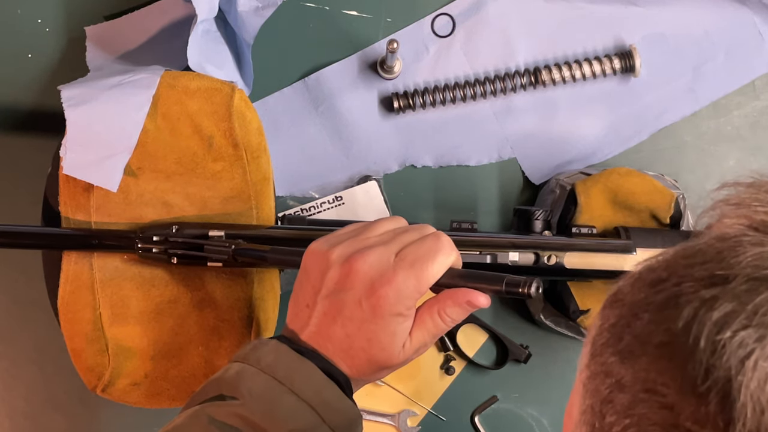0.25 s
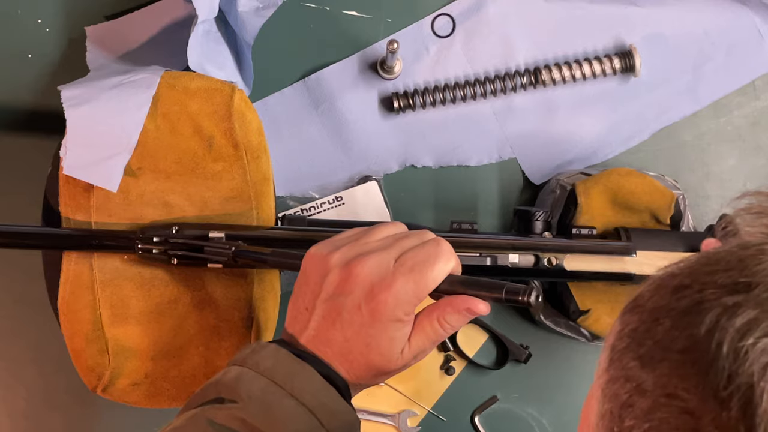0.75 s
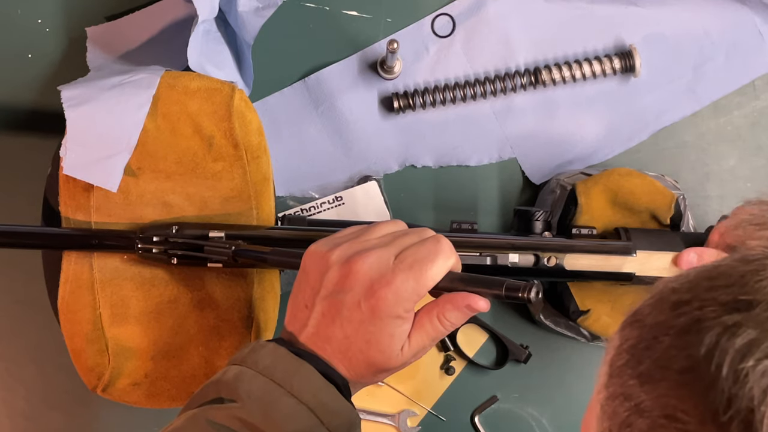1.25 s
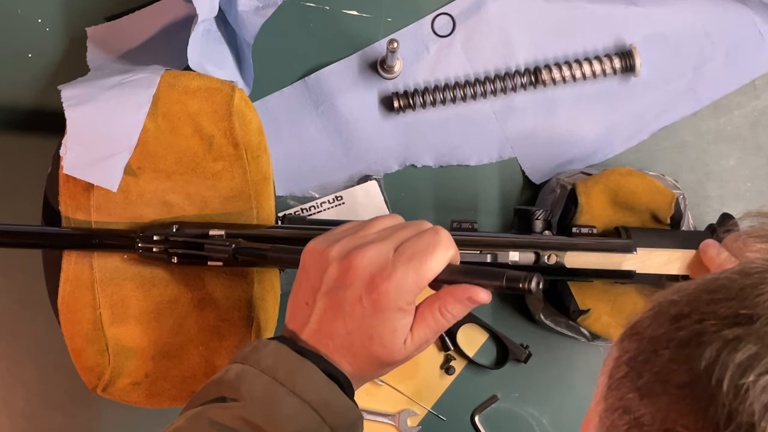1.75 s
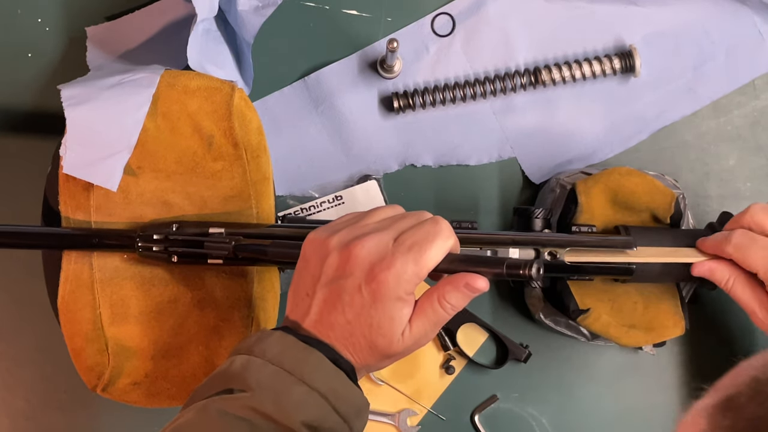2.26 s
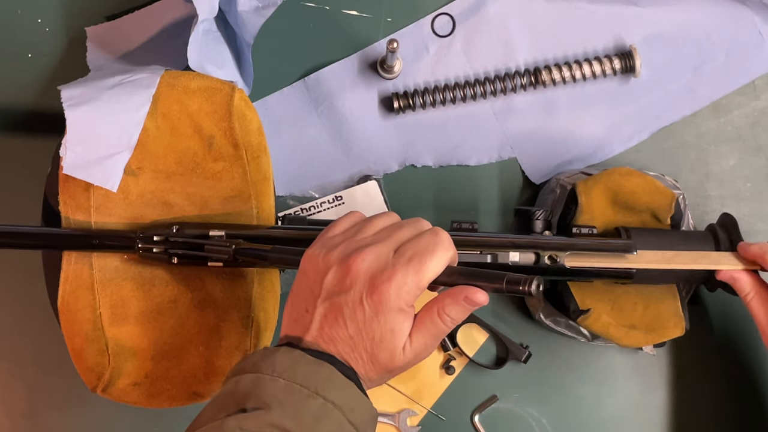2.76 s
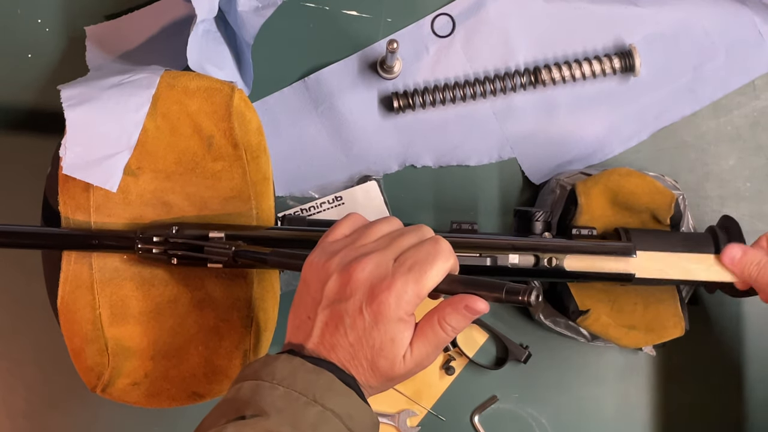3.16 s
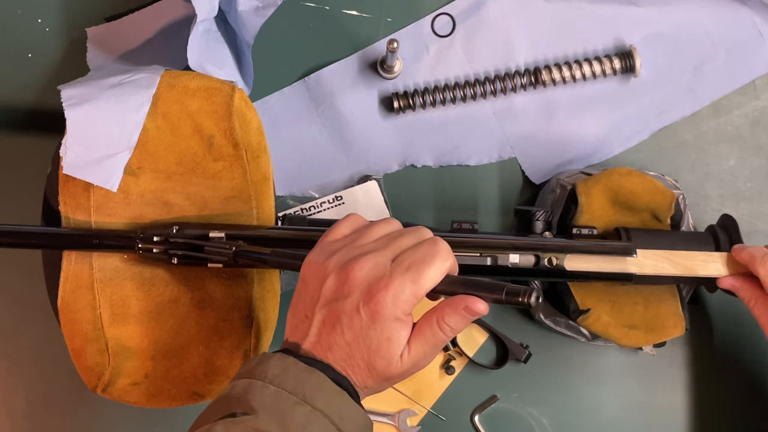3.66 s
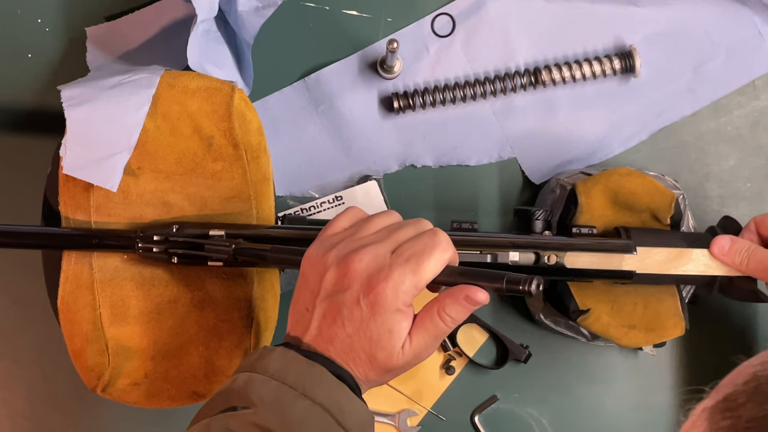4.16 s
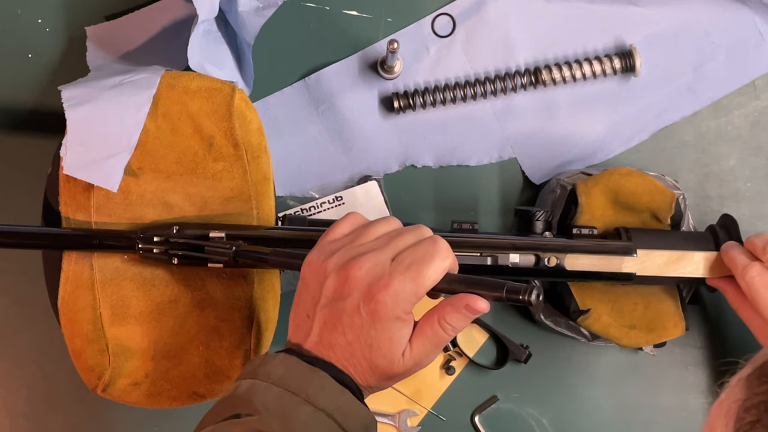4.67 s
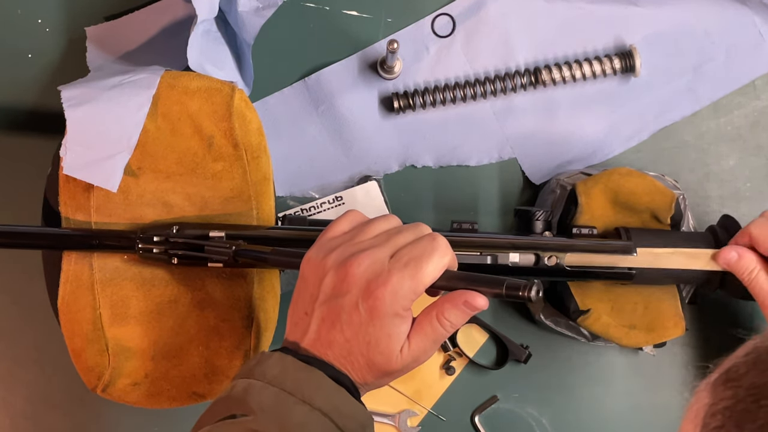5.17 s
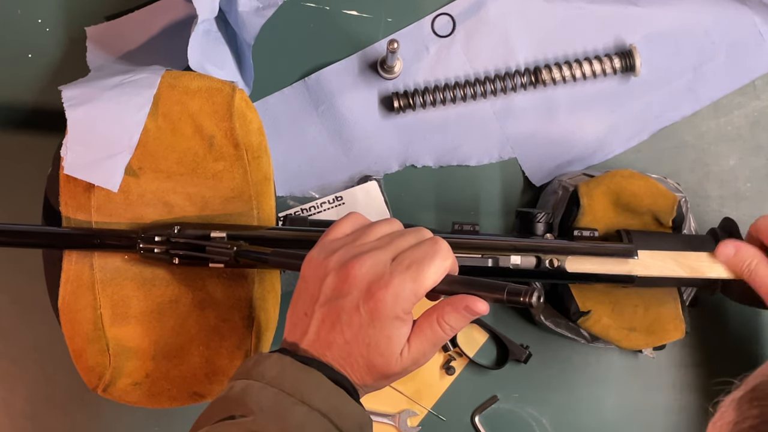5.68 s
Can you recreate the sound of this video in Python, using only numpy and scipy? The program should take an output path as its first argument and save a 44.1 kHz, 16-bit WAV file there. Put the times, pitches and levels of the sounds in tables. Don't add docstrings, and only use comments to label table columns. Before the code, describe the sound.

Close stereo pickup of a hand pushing and twisting a padded stick in a hollow steel cylinder. Bright, gritty clacks tumble in irregular clusters with short squeaky metallic tones, low bench thumps and a quick room tail. Quiet pauses hold soft touches, sleeve rustle and a faint loose-metal rattle; the later strokes hit loudest, then it calms.

```python
import sys
import numpy as np
from scipy import signal
from scipy.fft import rfft, irfft, next_fast_len
from scipy.io import wavfile
from scipy.ndimage import uniform_filter1d, map_coordinates

SR = 44100
rng = np.random.default_rng(int(sys.argv[2]) if len(sys.argv) > 2 else 0)


def digitize_waveform(pressure):
    field = np.atleast_2d(pressure).T
    bounded = np.clip(field, -1, 1)
    quanta = np.round(bounded * 32767).astype(np.int16)
    wavfile.write(sys.argv[1], SR, quanta)


def gain_from_db(level_db):
    decades = np.asarray(level_db, float) / 20
    return 10 ** decades


N = 261072


# start_s, peak_db, air_ring_hz, weight_db
FIRST_PASS = [(0.002, -25, 5240, 3), (0.017, -22.5, 4130, 9.5), (0.023, -28, 4500, -1),
              (0.034, -24, 4110, 5), (0.0532, -27.5, 4600, 4.5), (0.0467, -24.5, 4390, 5.5),
              (0.07, -21, 4390, 0.5), (0.1009, -17.5, 5300, 5), (0.122, -17, 5950, 4.5),
              (0.1397, -21, 4310, 5.5), (0.163, -22.5, 4520, 3), (0.196, -19, 4900, 3.5),
              (0.7497, -14.5, 5530, 5.5), (0.7883, -18.5, 5300, 3.5), (0.8272, -15, 4900, 3.5),
              (0.845, -29.5, 4850, -11), (0.8763, -15.5, 5300, -0.5), (.895, -22.5, 6500, -2),
              (0.9083, -16.5, 6960, 1), (0.9325, -18.5, 6400, 2), (0.9558, -22, 5300, 4.5),
              (0.9849, -18, 5300, 1), (1.0294, -25, 4750, 1.5), (1.106, -13.5, 4630, 0),
              (1.112, -20, 4780, -8.5), (1.1279, -15.5, 4840, 1.5), (1.136, -19, 4900, -5.5),
              (1.14, -24, 4700, 0), (1.146, -28, 4700, 0), (1.1541, -17, 4600, 0), (1.171, -29, 4800, -7.5),
              (1.1978, -17.5, 4400, 0.5), (1.2316, -15, 4470, 2.5)]
SECOND_PASS = [(2.08, -15.5, 6000, 3), (2.1267, -16.5, 5470, 4), (2.1337, -22, 5500, 2),
               (2.16, -16, 5530, 0.5), (2.1728, -28.5, 4860, 5.5), (2.1993, -20, 5760, 1),
               (2.2304, -19, 3000, -0.5), (2.262, -21, 3010, 1.2), (3.0162, -14, 4440, 2),
               (3.0333, -23.5, 4950, -11), (3.047, -21.5, 5260, 1.5), (3.089, -15.5, 4170, -0.8),
               (3.1136, -21, 4220, -7.5), (3.1314, -14, 3750, -3), (3.1481, -15, 5030, 2),
               (3.1621, -13, 3560, -4), (3.176, -13, 3470, -1.5), (3.1884, -13, 3730, 3),
               (3.2, -12.5, 3660, -13.5), (3.2116, -11.5, 3570, 1.5), (3.2177, -14, 5490, 1.5),
               (3.2308, -14.5, 3500, 5), (3.2407, -15, 3470, 2.6), (3.2507, -19, 3570, 5),
               (3.2637, -15.5, 5120, 1), (3.2715, -14, 3750, 4.5), (3.2833, -17, 3750, -4),
               (3.2916, -22, 3650, 9), (3.303, -23.5, 3910, 2)]
THIRD_PASS = [(3.7811, -31, 3600, 0), (3.7995, -17.5, 3600, -2.5), (3.832, -17, 4170, 0),
              (3.86, -19.5, 6420, 2), (3.8839, -22.5, 5810, 6), (3.906, -22.5, 4820, 6),
              (3.937, -16, 4150, 0.5), (3.966, -13, 4200, -1), (3.9887, -13, 5170, 1),
              (4.0057, -12.5, 4690, 0), (4.022, -9.5, 4600, 2.5), (4.036, -11, 4440, -2),
              (4.0553, -10.5, 4400, -0.5), (4.068, -25, 4680, -7), (4.079, -31, 4660, -2.5),
              (4.0904, -31, 4680, -5.5)]
LAST_PASS = [(4.8494, -16.5, 5840, 2.5), (4.9575, -8, 4300, 0), (4.9671, -14, 4500, -1.5),
             (4.9774, -13, 6200, -2), (5.0001, -11, 6400, -2.3), (5.0078, -18.5, 6070, 3.5),
             (5.0571, -14, 4130, 0), (5.08, -19.5, 3010, 4), (5.0963, -20, 3010, 4.5),
             (5.1108, -22, 3920, 3), (5.1353, -22, 4200, -4), (5.1513, -22, 4520, 2.5),
             (5.165, -20.5, 4100, -3.5), (5.1731, -19, 4310, 0.5), (5.1854, -19.5, 4130, 3.5),
             (5.3009, -8.5, 5370, 1.5), (5.3075, -21, 5600, -1), (5.3276, -16.5, 5050, -5.5),
             (5.341, -15.5, 3700, -13), (5.3639, -18.5, 3500, -2.5), (5.5003, -9, 6140, 0.6),
             (5.5173, -18.5, 4740, -3)]
# start_s, peak_db,
# air_ring_hz, weight_db, hardness_db
TOUCHES = [(0.384, -53.5, 3010, 7.5, -7), (0.4878, -46, 3010, 17, -31), (0.6807, -44, 6460, 10.5, -14.5),
           (2.0291, -28, 3060, 8, -19.5), (2.0346, -36.5, 4700, 2.5, -14.5), (2.384, -58.5, 3050, 14, -25),
           (3.4157, -41, 3150, 3.5, -20), (3.5356, -40.5, 2950, 6.5, -25), (3.6864, -45.5, 3010, 4, -26),
           (4.203, -26.5, 3900, 1.5, -16), (4.278, -50, 3600, 7.5, -10.5), (5.7324, -37, 3140, -8.5, -25),
           (5.7485, -39, 6400, 3, -16), (5.767, -43.5, 3060, 9.5, -8.5), (5.82, -44.5, 3010, 17, -19)]


def contacts():
    slid = []
    for slip in FIRST_PASS + SECOND_PASS + THIRD_PASS + LAST_PASS:
        hardness_db = -15.5 + 0.2 * slip[3]
        slid.append((*slip, hardness_db))
    return np.transpose(sorted(slid + TOUCHES))


# time_s, knock_grip_db, depth (-1 shallow to 1 deep), wash_after_slip_db
ROD = [(0.01, -16.5, -0.56, -0.5), (.2, -16, 0.18, -0.5), (.75, -19, 0.085, -1), (1.1, -12.5, 0.76, -3.5),
       (2.031, -16.5, 0.38, 2.5), (2.2, -8, -0.29, 0), (3.02, -9, -0.44, -2), (3.12, -10, -0.6, -4),
       (3.23, -16, 0.81, -1.5), (3.8, -13, -0.28, -2.5), (4.04, -15.5, 0.83, -3.5), (4.2, -6.5, -0.38, -1),
       (4.95, -14, -0.27, -3.5), (5.15, -11.5, -0.1, -1), (5.5, -12.5, -0.32, -2.5)]
DEPTH_LOW_DB, DEPTH_BODY_DB = 5, 3


def rod(s):
    at, *columns = np.transpose(ROD)
    return [np.interp(s, at, column) for column in columns]


PART_HZ = np.array([650, 1030, 1330, 1800, 2500, 3100, 3700, 4400, 5100, 5800, 6500, 7200])


def parts(hz):
    return np.array([np.interp(hz, PART_HZ, one) for one in np.eye(len(PART_HZ))])


# frequency_hz, density_db
TUBE = [(100, -41), (150, -9.5), (454, -15), (727, -10), (1040, -12), (1380, -8.5), (1530, -16.5),
        (1890, -4.5), (2900, -2.5), (4700, 0.5), (6500, -1), (6900, -8), (8800, -13), (12300, -14),
        (13450, -36.5), (16500, -42.5)]
# frequency_hz, width_hz, level_over_broad_colour_db
STEEL = [(730, 5.5, 8.5), (1040, 14, 13.5), (1136, 14, 0), (1236, 11, 2.5), (1338, 5.2, 7.5), (1893, 23, 6),
         (2190, 19, 6), (3650, 54, 3), (4300, 84, 4), (4117, 33, 0.5), (4760, 18, -2), (4985, 20, 5),
         (5840, 23, 6), (4850, 17, 0)]


def tube(hz):
    return along(TUBE, hz) * np.sqrt(1 + peaks(STEEL, hz) ** 2)


def slip_levels(s, db, ring_hz, body_db, edge_db):
    grip_db, depth, wash_db = rod(s)
    knock_db = grip_db + 0.93 * body_db + 15.0
    low, high = DEPTH_LOW_DB * depth, DEPTH_BODY_DB * depth
    near = np.exp(-(np.log(PART_HZ[5:-1, None] / ring_hz) / .15) ** 2)
    lift_db = 9 * near - 4
    lift_db[0] += body_db / 2
    thud_db = knock_db + 0.5 + 0.5 * depth
    colour_db = np.vstack([thud_db, knock_db - low, knock_db + low,
                           body_db + high, body_db - high, lift_db, edge_db + 15.0])
    size = gain_from_db(db + colour_db)
    lasting = size.copy()
    lasting[5:-1] *= gain_from_db(3.0 + wash_db - 5.9 * near)
    return size, lasting


def tiny_jerks(depth):
    t = np.arange(160) / SR
    jerks = rng.standard_normal((len(depth), len(t))) * (t / .00052) * np.exp(-t / 0.0004)
    spread = rfft(jerks)
    round_trip_s = (0.912 + 0.41 * depth[:, None]) / 1000
    column = 1 - 0.11 * np.exp(-2j * np.pi * np.fft.rfftfreq(len(t), 1 / SR) * round_trip_s)
    jerks = irfft(column * spread / np.abs(spread) ** .9)
    return jerks / np.linalg.norm(jerks, axis=1)[:, None]


# delay_s, level_db
ECHOES = [
    (.00108, -10.5),
    (.0042, -36.5),
    (.007, -8.5),
    (0.013, -16),
    (0.017, -15),
]


def walls(hz):
    return 1 + sum(gain_from_db(db) * np.exp(-2j * np.pi * hz * delay) for delay, db in ECHOES)


# tail_under_crack_db, t60_s
ROOM = [
    (-6.5, 0.23),
    (-13.5, 0.26),
    (-8.5, 0.26),
    (-9.5, 0.22),
]


def room_fade(start, lasting):
    energy = np.array([np.bincount(start, g ** 2, N) for g in lasting])
    room = np.repeat(ROOM, [3, 2, 6, 1], axis=0)
    fade = []
    for e, (db, t60) in zip(energy, room):
        fade.append(signal.lfilter([gain_from_db(db) ** 2], [1, -gain_from_db(-120 / (t60 * SR))], e))
    rattle = signal.lfilter([gain_from_db(-9.5) ** 2], [1, -gain_from_db(-120 / (.07 * SR))], energy)
    power = uniform_filter1d(np.array(fade) + rattle, 91, origin=45)
    return np.sqrt(np.abs(power)) * gain_from_db(1.3 * wobble(150))


def slips():
    events = contacts()
    size, lasting = slip_levels(*events)
    jerks = tiny_jerks(rod(events[0])[1])
    length = jerks.shape[1]
    start = np.round(events[0] * SR).astype(int)
    at = (start[:, None] + np.arange(length)).ravel()
    force = np.array([np.bincount(at, (g[:, None] * jerks).ravel(), N + length)[:N] for g in size])
    crack = filtered(force, lambda hz: parts(hz) * (causal(tube(hz)) * walls(hz))).sum(0)

    fade = room_fade(start, lasting)

    def diffuse():
        noise = rng.standard_normal(N) / 10
        return (fade * filtered(noise, lambda hz: parts(hz) * tube(hz))).sum(0)

    tail, stray = diffuse(), diffuse()
    return gain_from_db(16.0) * ports(crack + tail, gain_from_db(2) * stray - .3 * tail)


# start_s, pitch_hz, level_db, t60_s
SINGING = [(.003, 5240, -37, .15), (.07, 4360, -35, 0.12), (.198, 4460, -39, 0.21), (.751, 2154, -34, 0.14),
           (.79, 5100, -34, 0.22), (.829, 5310, -34.5, .2), (.878, 5330, -43.5, .2),
           (1.107, 4880, -29, 0.18), (1.13, 4790, -29.5, 0.17), (1.155, 4830, -37, 0.37),
           (1.233, 4850, -37.5, 0.28), (2.035, 4670, -55, 0.21), (2.03, 3240, -54, .3),
           (2.082, 3740, -33, 0.15), (2.162, 4650, -35.5, 0.18), (2.264, 1190, -54, 0.32),
           (2.2, 3350, -38, 0.13), (2.228, 1066, -34.5, 0.049), (3.02, 4800, -43, 0.58),
           (3.019, 2560, -41, 0.097), (3.091, 4700, -35.5, 0.23), (3.117, 2117, -39, 0.19),
           (3.241, 3746, -36.5, 0.32), (3.801, 3270, -40.5, 0.2), (3.907, 4800, -42.5, 0.26),
           (3.939, 5700, -34, 0.24), (4.008, 4850, -29.5, 0.25), (4.059, 4810, -33.5, 0.28),
           (4.202, 945, -34, 0.023), (4.204, 746, -43.5, 0.067), (5.081, 2700, -32, 0.024),
           (5.096, 2790, -30, .03), (.122, 2730, -36.5, .03), (4.851, 4960, -46, 0.44),
           (4.851, 3730, -42.5, 0.26), (4.96, 4510, -31, 0.31), (5.06, 4900, -34.5, 0.21),
           (5.082, 1018, -40, 0.26), (5.082, 2835, -44, 0.17), (5.154, 4920, -36, 0.22),
           (5.187, 1047, -35, 0.12), (5.303, 5420, -42, 0.25), (5.301, 1070, -45, 0.076),
           (5.502, 1088, -41.5, 0.29), (5.502, 4710, -39, 0.32), (5.502, 6270, -47.5, 0.36),
           (3.018, 2800, -28, 0.026), (4.057, 1280, -42.5, 0.29)]


def trapped_air():
    t = np.arange(SR // 3) / SR
    out = np.zeros(N + SR)
    for s, hz, db, t60 in SINGING:
        scatter, phase = rng.standard_normal((2, 14, 1))
        spread = .05 if hz > 1500 else .018
        modes = np.sin(2 * np.pi * (hz * (1 + spread * scatter) * t + phase)).sum(0)
        envelope = gain_from_db(db - 9.0 - 60 * t / t60) * (1 - np.exp(-t / 0.0015))
        out[round(s * SR):][:len(t)] += envelope * modes
    return out[:N]


# start_s, pitch_hz, peak_db
POPS = [(0.0313, 4020, -28.5), (0.0457, 3480, -36), (0.0689, 5300, -32.5), (0.1076, 5530, -30.5),
        (0.121, 4310, -25), (0.14, 6230, -34), (0.1956, 1900, -32), (0.7479, 5650, -25.5),
        (0.7883, 4250, -27), (0.8952, 1930, -35.5), (0.9306, 3340, -31), (0.9558, 6200, -42.5),
        (1.1541, 5600, -28.5), (2.0803, 4400, -30.5), (2.0803, 3630, -25.5), (2.1273, 4200, -26),
        (2.135, 1850, -33), (2.1728, 5100, -29.5), (2.1728, 1060, -33.5), (2.201, 4000, -34.5),
        (2.1991, 1060, -32), (2.1996, 2800, -32), (2.2635, 2770, -34), (2.2624, 4260, -36.5),
        (3.0166, 5160, -32.5), (3.0885, 4170, -27), (3.1146, 4240, -26.5), (3.1314, 3550, -31.5),
        (3.1314, 4910, -29), (3.1462, 5200, -27.5), (3.162, 5740, -25.5), (3.2008, 6430, -26),
        (3.233, 2300, -34), (3.2399, 5300, -22.5), (3.2511, 3630, -24.5), (3.2609, 3750, -22.5),
        (3.2926, 3660, -24.5), (3.7798, 3660, -43), (3.7978, 4300, -29.5), (3.8602, 4100, -35.5),
        (3.9369, 4160, -22), (4.9678, 4520, -30.5), (4.965, 6360, -24), (5.0593, 1060, -34),
        (5.1101, 4000, -37), (5.1513, 4200, -31), (5.1644, 1030, -27.5), (5.172, 4300, -27),
        (5.186, 3720, -31), (5.328, 3660, -22.5), (5.3263, 5770, -29), (5.3274, 4200, -25),
        (5.3643, 3600, -25.5), (5.4999, 4340, -20), (3.0154, 4330, -28.5), (3.0225, 4470, -32.5),
        (5.008, 2730, -28.5), (5.7385, 5300, -52), (5.8276, 2820, -43.5), (5.821, 5000, -54)]
# start_s, pitch_hz, peak_db
KNELLS = [
    (2.159, 1230, -39.5),
    (2.263, 1042, -38.5),
    (3.9886, 1268, -37),
    (4.0055, 1300, -34.5),
    (4.021, 1250, -35.5),
    (4.037, 1260, -37),
    (4.0567, 1229, -30.5),
    (4.9568, 1270, -32),
    (5.0001, 1030, -36.5),
]


def steel_tones():
    t = np.arange(SR // 15) / SR
    out = np.zeros(N + SR)
    for rows, t60 in ((POPS, 0.013), (KNELLS, .05)):
        for s, hz, db in rows:
            envelope = gain_from_db(db + 5.5 - 60 * t / t60) * (1 - np.exp(-t / 0.00012))
            out[round(s * SR):][:len(t)] += envelope * np.sin(2 * np.pi * hz * t)
    return out[:N]


def singing():
    tones = trapped_air() + steel_tones()
    return ports(tones, .3 * np.roll(tones, 200))


# start_s, held_s, strength_db, place (0 to 2, deep to upper modes)
SHOVES = [(0.01, 0.099, -45.5, 1.8), (.17, 0.042, -42, 1.4), (.38, .05, -65, 1.4),
          (0.671, 0.036, -55.5, 1.44), (.8, 0.015, -44, 1.33), (.93, 0.11, -38.5, 1.31),
          (1.14, 0.014, -36.5, 0.92), (1.24, 0.02, -44, 2.6), (1.361, .03, -61, 0.21),
          (1.75, 0.054, -58, 0.23), (2.131, 0.096, -44, 1.1), (2.28, 0.0086, -43.5, 0.19),
          (2.52, 0.0084, -63, .2), (2.88, 0.024, -67.5, 1.1), (3.05, 0.13, -48.5, 1.67),
          (3.2, .11, -40, 1.42), (3.38, 0.043, -54, 0.29), (3.578, 0.0061, -52, 1.1),
          (3.74, 0.014, -67, 1.3), (3.87, 0.071, -40.5, 1.43), (3.999, 0.11, -39.5, 0.087),
          (4.02, .02, -60.5, 0.8), (4.271, 0.059, -63, 0.89), (4.88, .02, -62, 0.7),
          (4.98, 0.049, -40, 1.28), (5.14, 0.021, -46, 0.18), (5.17, 0.08, -46, 1.64),
          (5.36, 0.013, -40.5, 0.31), (5.578, 0.0074, -44, 0.16), (5.82, .02, -62, 0.45)]
BENCH_REST_DB = [
    -66.5,
    -80.5,
    -77.5,
]


def shaking():
    place = np.transpose(SHOVES)[3]
    shares = gain_from_db(-8 * np.abs(place - np.arange(3)[:, None]))
    driven = swells(SHOVES, rise_db_s=307.5, fall_db_s=190, shares=shares)
    return driven + gain_from_db(np.array(BENCH_REST_DB))[:, None]


# frequency_hz, width_hz, level_db
BENCH_MODES = [
    [(66.7, 18, 0)],
    [(92.8, 15, 0)],
    [(134.2, 11, -0.5), (200.8, 26, -4)],
]


def bench():
    hum = []
    for modes in BENCH_MODES:
        hum.append(unit(filtered(rng.standard_normal(N), lambda hz: peaks(modes, hz) ** 1.33)))
    gains = shaking()
    mid = (gains * hum).sum(0)
    side = gain_from_db(-18.5) * gains[2] * np.roll(hum[2], SR)
    return np.array([mid + side, mid - side])


# time_s, level_db
SLEEVES = [(0, -60), (.6, -72), (1.2, -74), (1.55, -79.5), (1.71, -83), (1.75, -74.5), (2.06, -77.5),
           (2.34, -69.5), (2.92, -72.5), (3.5, -66.5), (3.58, -79.5), (3.76, -79.5), (4.3, -64),
           (4.37, -76.5), (4.82, -83.5), (5.29, -57.5), (5.71, -73), (5.92, -80.5)]
# start_s, held_s, pressure_db
RUBS = [
    (0.001, 0.061, -35),
    (.9, 0.073, -37),
    (1.14, .02, -53),
    (2.19, 0.0034, -53),
    (3.19, 0.013, -28.5),
    (3.95, 0.046, -49),
    (5.07, 0.076, -42.5),
    (5.76, .01, -66),
]


def rubbing():
    s, db = np.transpose(SLEEVES)
    moving = gain_from_db(np.interp(np.arange(N) / SR, s, db, left=-150, right=-150))
    return moving + swells(RUBS, rise_db_s=266.5, fall_db_s=187, shares=np.ones((1, len(RUBS))))[0]


# frequency_hz, density_db
SLEEVE = [(410, -27.5), (700, -8.5), (1500, -8.5), (1920, -10.5), (2010, -0.5), (2100, -7), (4200, -8.5),
          (5100, -11.5), (6500, -13), (6900, -20.5), (11500, -21.5), (13000, -42)]


def rustle():
    rub_gain = rubbing()
    sleeve_gain = np.minimum(rub_gain, gain_from_db(-66))
    sleeve = sleeve_gain * unit(filtered(patchy(2.6, channels=2), lambda hz: along(SLEEVE, hz)))
    grain = rng.standard_normal((2, N)) * gain_from_db(0.65 * wobble(30) + 0.67 * wobble(250))
    cloth = (rub_gain - sleeve_gain) * unit(filtered(grain, tube))
    depth = rod(np.arange(N) / SR)[1]
    cloth += (gain_from_db(-1.6 * DEPTH_LOW_DB * depth) - 1) * filtered(cloth, lambda hz: parts(hz)[1])
    brushed = gain_from_db(0.5) * ports(*sleeve * gain_from_db([[0], [-1]]))
    return brushed + gain_from_db(-2.0) * ports(*cloth * gain_from_db([[0], [-5]]))


# frequency_hz, width_hz, level_db
LOOSE = [
    [(5720, 180, 1), (2950, 110, -4.5), (4310, 140, -5), (7600, 370, -18), (10400, 1300, -16)],
    [(3330, 66, -1), (2640, 140, -15)],
]
# start_s, high_db, low_db
JINGLE = [(1.477, -67.5, -86), (1.523, -86, -69.5), (1.572, -79.5, -90), (2.475, -65.5, -89.5),
          (2.9, -90, -72), (3.687, -83, -64), (3.717, -83, -66), (4.291, -64.5, -61.5), (4.38, -64, -74.5),
          (4.42, -80, -96), (4.459, -65, -73), (4.502, -66, -79), (4.563, -69.5, -67), (4.59, -70, -75),
          (4.671, -74.5, -94.5), (4.708, -78.5, -89)]


def jingle():
    rings = []
    for modes in LOOSE:
        rings.append(unit(filtered(rng.standard_normal(N), lambda hz: peaks(modes, hz) ** 1.1)))
    after = np.arange(SR // 4) / SR
    shape = (1 - np.exp(-after / 0.0047)) * gain_from_db(-60 * (after / 0.14) ** 1.01)
    level = np.zeros((2, N + SR))
    for s, *db in JINGLE:
        level[:, round(s * SR):][:, :len(after)] += gain_from_db(3.5 + np.array(db))[:, None] * shape
    return (level[:, :N] * rings).sum(0) * gain_from_db([[.3], [-.3]])


# frequency_hz, density_db
MURMUR = [
    (25, -45.5),
    (45, 2.5),
    (76, 0),
    (109, -17.5),
    (325, -8),
    (540, -18.5),
    (600, -12.5),
    (680, -17),
    (1170, -58),
]


def murmur():
    gain = gain_from_db(-34) * rubbing() ** 0.69 + gain_from_db(-21) * shaking()[2]
    noise = rng.standard_normal((2, N))
    low, wide = filtered(noise, lambda hz: along(MURMUR, hz) * np.array([hz ** 0, hz / (hz + 1500)]))
    return gain_from_db(10.0) * gain * gain_from_db(3.6 * wobble(25)) * unit(np.array([low + wide, low - wide]))


# frequency_hz, density_db
ACROSS = [(100, -54), (391, -27), (740, -18.5), (1820, -12.5), (2600, -14.5), (4170, -24), (6200, -29.5),
          (7100, 5.5), (9350, -12), (10600, -32.5), (11600, -35), (12800, -17.5), (15300, -31.5),
          (16500, -51.5)]


def ports(mid, stray):
    def gradient(hz):
        lean = np.exp(.3j * (hz < 1700))
        return 1j * lean * along(ACROSS, hz) / along(TUBE, hz)

    side = gain_from_db(-3.0) * filtered(mid + stray, gradient)
    return np.array([mid + side, mid - side])


def unit(x):
    return x / np.sqrt(np.mean(x ** 2) + 1e-20)


def along(points, hz):
    f, db = np.transpose(points)
    return gain_from_db(np.interp(np.log(hz + 1), np.log(f + 1), db))


def peaks(modes, hz):
    return np.sqrt(sum(gain_from_db(db) ** 2 / (1 + (2 * (hz - c) / w) ** 2) for c, w, db in modes))


def filtered(x, response):
    m = 2 * next_fast_len(N // 2 + SR // 4)
    return irfft(rfft(x, m) * response(np.fft.rfftfreq(m, 1 / SR)), m)[..., :N]


def causal(gain):
    cepstrum = irfft(np.log(gain + 1e-6))
    half = len(cepstrum) // 2
    cepstrum[1:half] *= 2
    cepstrum[half + 1:] = 0
    return np.exp(rfft(cepstrum))


def wobble(rate):
    knots = rng.standard_normal(int(N * rate / SR) + 4)
    return map_coordinates(knots, [np.arange(N) * rate / SR])[None]


def patchy(depth_db, channels):
    z = signal.stft(rng.standard_normal((channels, N + SR)), nperseg=256)[2]
    field = uniform_filter1d(rng.standard_normal(z.shape[1:]), 7, 0)
    field = uniform_filter1d(field, 14, 1)
    return signal.istft(z * gain_from_db(depth_db * unit(field)), nperseg=256)[1][:, :N]


def swells(rows, rise_db_s, fall_db_s, shares):
    s, held, db = np.transpose(rows)[:3, :, None]
    t = np.arange(0, N + 64, 64) / SR
    rise_db = rise_db_s * np.clip(s - t, 0, None)
    fall_db = fall_db_s * np.clip(t - s - np.abs(held), 0, None)
    each = gain_from_db(db - rise_db - fall_db)
    return np.array([np.interp(np.arange(N) / SR, t, layer) for layer in shares @ each])


def scene():
    return slips() + singing() + bench() + rustle() + jingle() + murmur()


def roll_off(x):
    return signal.sosfilt(signal.butter(12, 16300, fs=SR, output="sos"), x)


def record(dry):
    mix = filtered(dry, lambda hz: 1 / (1 + (38 / (hz + 1)) ** 6))
    return roll_off(mix)


dry = scene()
out = record(dry)
digitize_waveform(out)
```